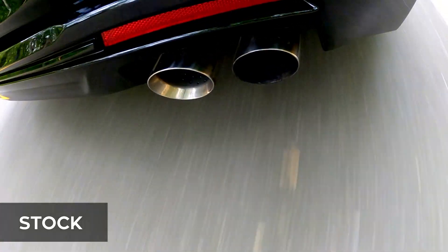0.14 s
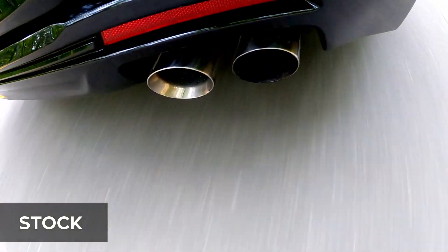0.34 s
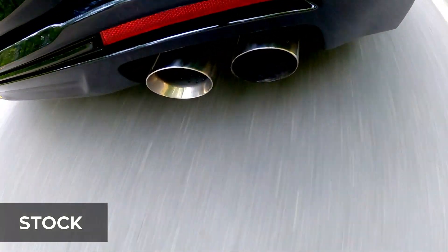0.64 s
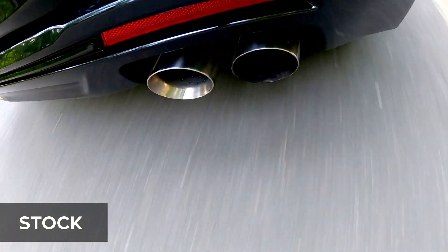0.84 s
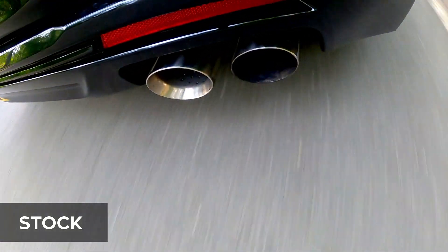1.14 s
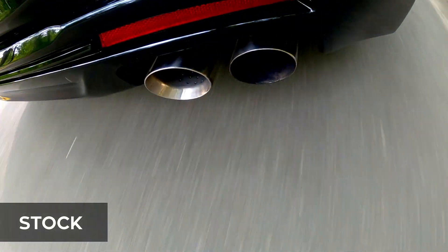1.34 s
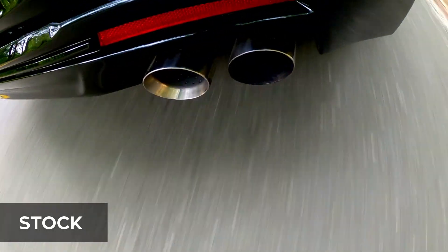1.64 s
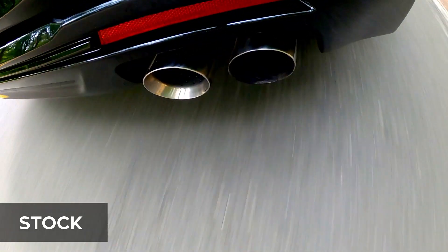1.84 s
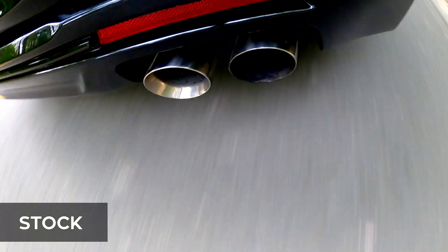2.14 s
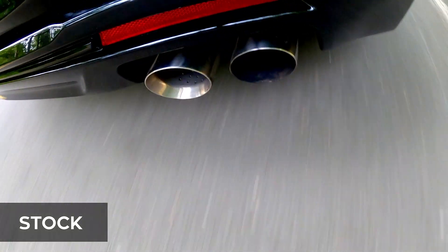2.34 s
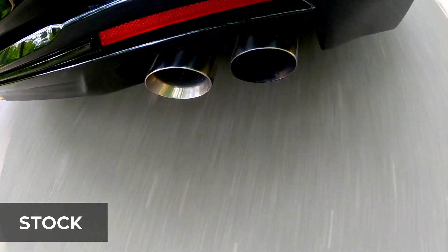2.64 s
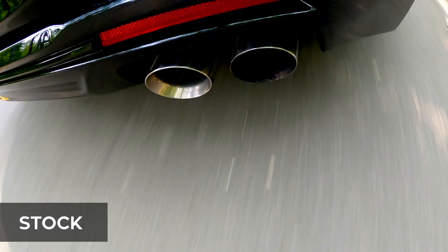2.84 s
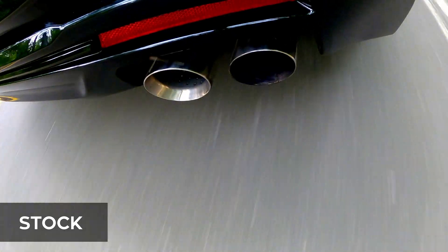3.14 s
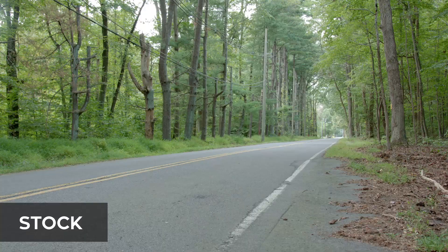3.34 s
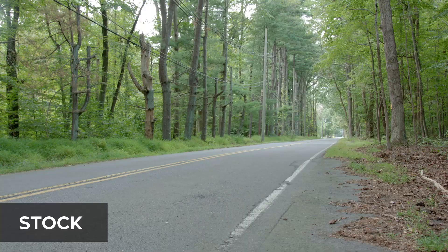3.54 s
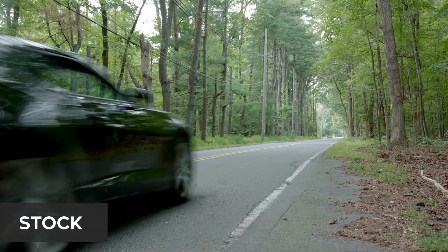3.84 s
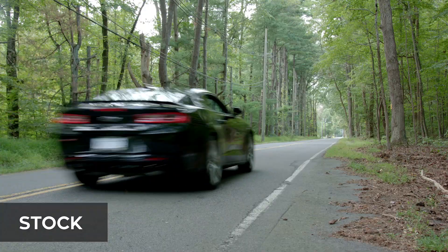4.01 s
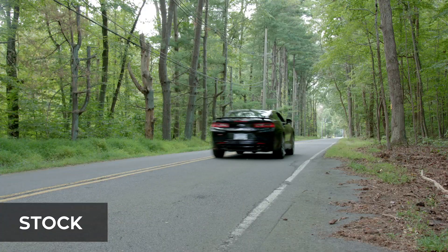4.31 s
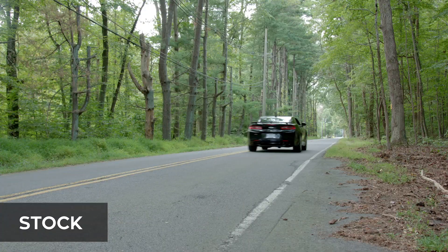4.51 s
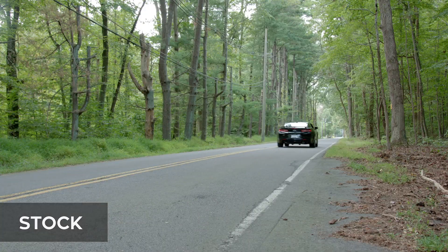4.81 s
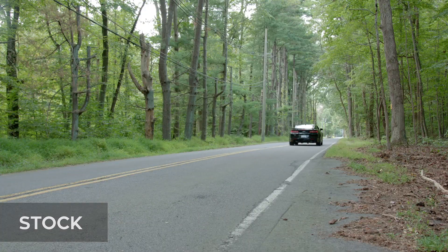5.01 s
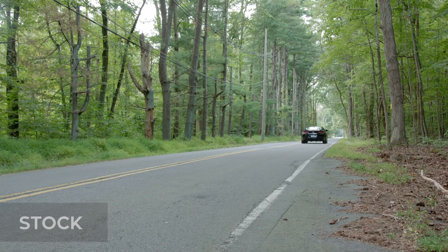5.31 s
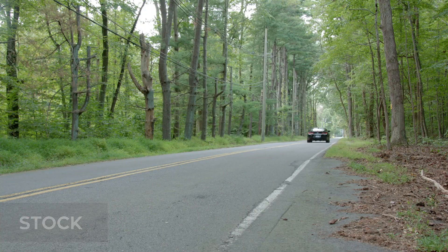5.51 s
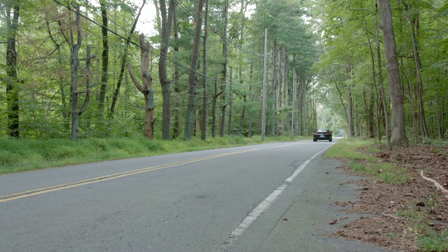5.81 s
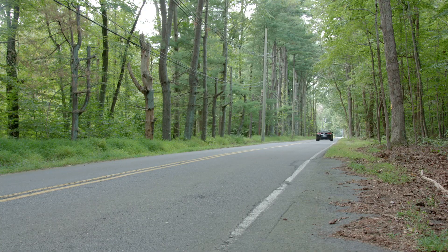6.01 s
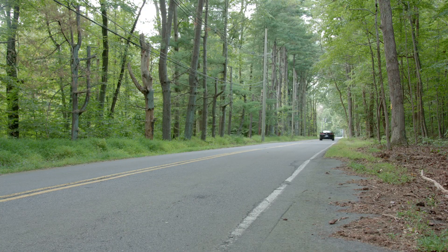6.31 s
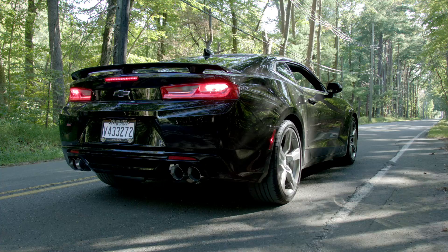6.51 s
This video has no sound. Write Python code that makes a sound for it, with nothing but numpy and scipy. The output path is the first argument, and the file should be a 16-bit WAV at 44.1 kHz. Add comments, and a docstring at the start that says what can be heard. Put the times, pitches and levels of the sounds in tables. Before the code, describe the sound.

A V8 sports car pulls hard heard beside its tailpipes, burbles off the throttle, then roars past, cracks on the upshift and recedes.

```python
"""Beside the tailpipes of a V8 sports car, an overloaded microphone hears it pull hard, lift off and
pull again. Then, from the verge of a wooded road, it rushes past, cracks on the upshift, pulls away and
lifts off; at last it burbles at idle, heard from close behind. Eight uneven firings repeat every engine
cycle: the pipes boom and bark, gas rasps in the pulses, tyres and wind roar."""
import sys
import numpy as np
from scipy import signal
from scipy.fft import rfft, irfft, next_fast_len
from scipy.io import wavfile
from scipy.ndimage import uniform_filter1d

SR = 44100
rng = np.random.default_rng(int(sys.argv[2]) if len(sys.argv) > 2 else 0)


def inscribe(sig):
    """Save sig as 16-bit PCM at rate SR to the path in sys.argv[1].

    A 1-D sig is mono; a 2-D sig holds one channel per row.
    Samples are clipped to [-1, 1] before scaling.
    """
    pcm = np.round(np.clip(np.atleast_2d(sig).T, -1, 1) * 32767)
    wavfile.write(sys.argv[1], SR, pcm.astype(np.int16))


N = 293706
T = np.arange(N) / SR
VERGE_S, IDLE_S = 3.278, 6.445  # the second and third microphone positions begin


def undb(db):
    """Decibels to gain."""
    return 10 ** (np.asarray(db) / 20)


def unit(x):
    """Scale to rms 1."""
    return x / np.sqrt(np.mean(x ** 2))


def curves(rows):
    """Each column after the first (time) as a control, sample by sample."""
    times_s, *columns = np.transpose(rows)
    return [np.interp(T, times_s, column) for column in columns]


def colour(x, points):
    """Filter by a spectrum of (freq_hz, level_db) points; rms 1."""
    size = next_fast_len(N + 8192)
    hz, db = np.transpose(points)
    bins_hz = np.maximum(np.fft.rfftfreq(size, 1 / SR), 1)
    skirt = np.minimum(bins_hz / hz[0], 1) ** 2 * np.minimum(hz[-1] / bins_hz, 1) ** 2
    gain = undb(np.interp(np.log(bins_hz), np.log(hz), db))
    return unit(irfft(rfft(x, size) * skirt * gain, size)[:N])


def noise(points):
    """Coloured noise of rms 1."""
    return colour(rng.standard_normal(N), points)


def walk(rate_hz):
    """Glides between random values, rate_hz of them a second; rms 1."""
    hold = int(SR / rate_hz)
    steps = np.repeat(rng.standard_normal(N // hold + 1), hold)
    return unit(uniform_filter1d(steps, hold)[:N])


def after(centre_s, fade_s):
    """Rises from 0 to 1 around centre_s."""
    return np.clip((T - centre_s) / fade_s + .5, 0, 1)


def swell(peak_s, width_s):
    """A bell curve that reaches 1 at peak_s."""
    return np.exp(-((T - peak_s) / width_s) ** 2)


def repeat(cycle, turns):
    """Play one engine cycle over and over; turns counts the cycles gone by."""
    return np.interp((turns % 1) * len(cycle), np.arange(len(cycle) + 1), np.r_[cycle, cycle[0]])


# The cylinders in firing order: late_firing_intervals, boom_db, bark_db, coast_db
CYLINDER_PULSES = [(-0.00029, 1, 5, 4), (0.265, 1, -2, 2.5), (0.054, 1, -3, -7.5), (0.108, 0, -4, -10.5),
                   (0.276, -1, 2, -16.5), (-0.036, 0.5, -9, -14), (.18, -1, -1, -12),
                   (0.045, -1.5, -11.5, 3.5)]


def firings(cylinders=8):
    """Each exhaust pulse's place in the cycle (the far bank's arrive late) and its three strengths."""
    late, *strengths_db = np.transpose(CYLINDER_PULSES)
    return (np.arange(cylinders) + late) / cylinders, *undb(strengths_db)


def pipe_note(turns, db, boom_orders, contrast=1.5, lope=0, size=1024):
    """Firings ring the pipes: boom (low multiples of the cycle rate) and bark (the rest), each rms 1."""
    place, boom, bark, coast = firings()
    orders = np.arange(len(db)) + 1
    pulses = np.exp(-2j * np.pi * np.outer(orders, place))
    boom_pattern = pulses @ ((1 - lope) * boom + lope * coast)
    bark_pattern = pulses @ bark ** contrast  # one cylinder barks hardest: a throb once a cycle
    parts = []
    for pattern, band in (boom_pattern, orders <= boom_orders), (bark_pattern, orders > boom_orders):
        # an open pipe radiates the change of the flow: a quarter turn of phase
        spectrum = 1j * undb(db) * band * pattern / np.abs(pattern)
        cycle = unit(irfft(np.r_[0, spectrum], size))
        parts.append(repeat(cycle, turns))
    return np.array(parts)


# Pulls on the throttle while riding along: down_s, fade_start_s, fade_length_s
# The first dies away as the driver lifts; the second fades out before the scene changes.
THROTTLE_PULLS = [(-.5, 0.598, .26), (1.493, 2.946, .35)]


def engine_load(press_s=0.19, fade_curve=1.7):
    """Strength of the pull, 0 to 1 (flat out): it builds evenly, then fades, slowly at first."""
    load = np.zeros(N)
    for down_s, fade_start_s, fade_length_s in THROTTLE_PULLS:
        pressed = np.clip((T - down_s) / press_s, 0, 1)
        faded = np.clip((T - fade_start_s) / fade_length_s, 0, 1) ** fade_curve
        load += pressed * (1 - faded)
    return load


def effort(cycle_hz, load, full_db, coast_db, octave_db, cruise_hz=30.1):
    """Exhaust level in dB: it rises with load and with each octave of revs."""
    return load * full_db + (1 - load) * coast_db + octave_db * np.log2(cycle_hz / cruise_hz)


# The note at the pipes, a row per multiple of the cycle rate from 1 up:
# low_revs_db, middle_revs_db, high_revs_db, coast_db
CLOSE_HARMONICS = [(-33, -50, -27, -16), (-21, -20, -22, -4.5), (-27, -15.5, -11.5, -19),
                   (-14.5, -11.5, -13.5, -3.5), (-14.5, -22, -12.5, -5), (-9, -9.5, -11, -8.5),
                   (-31, -38, -15, -2), (1.5, -0.5, 0.5, 6), (-15, -16, -5.5, -10), (-12, -8.5, -9.5, 5.5),
                   (-20, -5.5, -6, -9.5), (-2, -6, -12.5, -21.5), (-10.5, -32, -36, -22.5),
                   (-15, -21.5, -35, -26.5), (-21.5, -40, -35, -12.5), (-22.5, -9.5, -12.5, -4.5),
                   (-23, -15.5, -42, -25.5), (-16, -21.5, -20, -8.5), (-32, -17, -12, -22),
                   (-14.5, -20, -6, -9), (-40, -26, -35, -24), (-31, -15.5, -5, -7.5),
                   (-14, -19, -7.5, -23), (-6.5, -9.5, -5.5, -1.5), (-21, -9, -4.5, -9),
                   (-9, -3.5, -16.5, -14.5), (-8.5, -22, -16, -3), (-25, -20, -32, -25),
                   (-19, -11.5, -23.5, -22.5), (-13, -24.5, -15.5, -17), (-10, -23.5, -25.5, -26),
                   (-33, -30, -41, -25), (-24, -16, -33, -35.5), (-16, -15, -38, -29),
                   (-23.5, -19, -24.5, -27), (-18.5, -22, -23, -39)]
# The throb at low, middle and high revs: cycle_hz, bark_contrast, lope_share
REV_RANGES = [(26.67, 0.64, .7), (29.7, 1.43, 0.45), (32.6, 2.5, 0.045)]


def close_exhaust(turns, cycle_hz, load, throttle):
    """Boom and bark right at the pipes: the note changes with revs and throttle."""
    *loaded_db, coast_db = np.transpose(CLOSE_HARMONICS)
    revs_hz, contrasts, lopes = np.transpose(REV_RANGES)
    shares = [np.interp(cycle_hz, revs_hz, row) for row in np.eye(len(loaded_db))]
    pull = sum(share * pipe_note(turns, db, boom_orders=15, contrast=contrast, lope=lope)
               for share, db, contrast, lope in zip(shares, loaded_db, contrasts, lopes))
    # off the throttle the charges burn unevenly
    overrun = pipe_note(turns, coast_db, boom_orders=15, lope=1.0) * undb(1.8 * walk(35.14))
    boom, bark = np.sqrt(throttle) * pull + np.sqrt(1 - throttle) * overrun
    boom_db = effort(cycle_hz, load, full_db=-16.0, coast_db=-31.5, octave_db=11)
    bark_db = effort(cycle_hz, load, full_db=-19.5, coast_db=-39.5, octave_db=17)
    return boom * undb(boom_db + 0.59 * walk(90)) + bark * undb(bark_db + walk(120))


def puffs(turns, decay_cycles, contrast, size=1024):
    """Gas flow: a surge at each firing that dies within a share of the cycle."""
    place, _, bark, _ = firings()
    age = (np.arange(size)[:, None] / size - place) % 1
    return unit(repeat(np.exp(-age / decay_cycles) @ bark ** contrast, turns))


# Churning gas, close up: freq_hz, level_db
CHURN_SPECTRUM = [(50, -14), (120, -2.5), (270, -7), (450, -4.5), (600, -1), (780, 9.5), (1000, -20),
                  (1500, -28)]


def churn(turns, cycle_hz, load):
    """Low noise pulsing with the gas flow; it stands out as the bark fades off the throttle."""
    flow = rng.standard_normal(N) * puffs(turns, decay_cycles=.1, contrast=.9)
    level_db = effort(cycle_hz, load, full_db=-31.5, coast_db=-41.0, octave_db=16.5)
    return colour(flow, CHURN_SPECTRUM) * undb(level_db)


def rasp(turns, fresh, decay_cycles, contrast, size=1400):
    """Gas tearing out in puffs: part repeats every cycle, part is fresh turbulence."""
    locked = repeat(signal.resample(rng.standard_normal(size), 2 * size), turns)
    return (locked + fresh * rng.standard_normal(N)) * puffs(turns, decay_cycles, contrast)


# Rasping and spitting gas at the pipe mouths: freq_hz, level_db
RASP_SPECTRUM = [(850, -10.5), (1020, -1.5), (1350, -5.5), (1690, 0.5), (2150, -10.5), (2560, -5.5),
                 (3050, -12), (3330, -7), (3850, -19), (4350, -19.5), (6000, -31), (9000, -39.5),
                 (15500, -50)]
SPIT_SPECTRUM = [(2800, -26), (5000, 8), (7000, -5), (11000, -16.5), (15500, -22)]


def gas_jets(turns, cycle_hz, load, howl_hz=32.27):
    """Gas rasps from the pipes, tearing harder under load as the cycle rate passes howl_hz."""
    howl = load * np.clip((cycle_hz - howl_hz) / 0.72 + .5, 0, 1)
    rasp_db = effort(cycle_hz, load, full_db=-28.5, coast_db=-55.0, octave_db=15.5) + 3.05 * howl
    tearing = rasp(turns, fresh=.5, decay_cycles=.18, contrast=.12)
    gas = colour(tearing * undb(1.56 * walk(200)), RASP_SPECTRUM) * undb(rasp_db)
    # the hardest firings spit, more so the faster the gas flows
    jets = rng.standard_normal(N) * puffs(turns, decay_cycles=.014, contrast=1.2)
    spit = colour(jets, SPIT_SPECTRUM) * undb(1.825 * rasp_db - 1 + 2.9 * walk(60))
    return gas + spit


# Wind and road at the microphone on the car: freq_hz, level_db
WIND_SPECTRUM = [(20, -13.5), (32, -7), (60, 1), (120, -8.5), (250, 1), (420, -13), (750, -4.5),
                 (1100, -16), (2500, -27), (5000, -64), (9000, -72.5)]


def wind():
    """Wind and road noise on the moving car, fluttering about a steady level."""
    return noise(WIND_SPECTRUM) * undb(-37.0 + 2.6 * walk(8.56))


def pops(rows, spectrum, decay_s, tail, tail_s=0.0061):
    """Unburnt fuel goes off in the pipes: a blow with a noisy tail, coloured by the pipes."""
    bursts = np.zeros(N)
    age = np.arange(SR // 20) / SR
    envelope = np.exp(-age / decay_s) + tail * np.exp(-age / tail_s)
    for start_s, level_db in rows:
        start = int(start_s * SR)
        bursts[start:start + len(age)] += undb(level_db) * rng.standard_normal(len(age)) * envelope
    return colour(bursts, spectrum) * np.std(bursts)


# Burbles, first at the pipes, later far down the road: start_s, relative_db
BURBLE_POPS = [(.952, -1), (.986, 5), (1.02, -0.5), (1.054, 1.5), (1.405, 0.5), (1.425, -3), (1.486, -6.5),
               (5.965, -18.5), (5.998, -13), (6.032, -16)]
# The hollow tone of a burble: freq_hz, level_db
BURBLE_SPECTRUM = [(60, -13.5), (130, -14.5), (260, 11.5), (350, -4.5), (450, -28.5), (760, -9),
                   (1100, -40.5)]


def burbles():
    """Soft pops of fuel in the pipes off the throttle."""
    return pops(BURBLE_POPS, BURBLE_SPECTRUM, decay_s=0.01, tail=0.16) * undb(-22)


def overload(x, ceiling, knee):
    """A microphone stage that flattens the peaks."""
    return x / (1 + np.abs(x / ceiling) ** knee) ** (1 / knee)


# Engine speed while riding along: time_s, cycle_hz
ONBOARD_REVS = [(0, 29.6), (.1, 30.54), (.36, 32.25), (.58, 33.18), (.71, 34.08), (.79, 33), (.9, 33),
                (1.1, 30.25), (1.51, 24.38), (1.66, 26.56), (1.78, 25.49), (1.9, 26.43), (2.5, 28.53),
                (2.95, 30.39), (3.06, 30.06), (3.28, 30.07)]


def beside_tailpipes():
    """Microphone on the car, so near the pipes that they overload it."""
    cycle_hz, = curves(ONBOARD_REVS)
    load = engine_load()
    throttle = np.clip(1.7 * load, 0, 1)
    wander = (0.000897 + 0.00609 * (1 - throttle)) * walk(60)
    turns = np.cumsum(cycle_hz * (1 + wander)) / SR + .85
    note = close_exhaust(turns, cycle_hz, load, throttle)
    gas = churn(turns, cycle_hz, load) + gas_jets(turns, cycle_hz, load)
    return overload(note + gas + wind() + burbles(), ceiling=.298, knee=12)


SPEED_M_S, VERGE_M = 22.8, 4.39  # the car's speed, and its closest distance to the microphone
NOSE_S, TAIL_S, ROAR_PEAK_S = 3.75, 3.947, 4.01  # the nose arrives, the tail is closest, the roar peaks
CUT_S, CUT_WIDTH_S, BITE_S, BITE_WIDTH_S = 4.075, 0.033, 4.155, 0.058  # upshift: drive cut, then bite
LIFT_S, LIFT_FADE_S = 5.753, .18  # far down the road the driver lifts off


def position():
    """Distance as a multiple of the closest, and how far the car faces us (1 nose on, 0 tail on)."""
    along_m = SPEED_M_S * (T - TAIL_S)
    distance_m = np.hypot(along_m, VERGE_M)
    return distance_m / VERGE_M, (1 - along_m / distance_m) / 2


def passing(near_db, doubling_db, ahead_db, alongside_db, shift_db, lift_db, coast_db_per_s):
    """Level in dB at the verge, shaped by distance, heading, the upshift and the lift."""
    distance, ahead = position()
    alongside = after(NOSE_S, .08) * ahead
    heading_db = ahead_db * ahead + alongside_db * alongside
    shift = swell(BITE_S, BITE_WIDTH_S) - 0.57 * swell(CUT_S, CUT_WIDTH_S)
    coast_db = lift_db * after(LIFT_S, LIFT_FADE_S) + coast_db_per_s * np.maximum(T - LIFT_S, 0)
    return near_db + doubling_db * np.log2(distance) + heading_db + shift_db * shift + coast_db


# The note from the verge, a row per multiple of the cycle rate from 1 up:
# approaching_db, leaving_low_revs_db, leaving_higher_revs_db
VERGE_HARMONICS = [(-40, -51, -46), (-25, -29.5, -32.5), (-16.5, -18, -15), (-10, -16.5, -13),
                   (-6.5, -22, -12), (-15, -8.5, -15.5), (-25, -19, -22), (0.5, 1, 1.5), (-11, -15, -8),
                   (-18, -19, -7.5), (-21, -6, 2), (-22, -2.5, -3.5), (-28, -12.5, -25), (-8, -16, -9.5),
                   (-20, -20, -5.5), (-5, -0.5, -0.5), (-9, -16, -20), (-1, -17.5, -24), (-17, -37, -11),
                   (-10, -21, -6.5), (-12, -21, -8), (-5, -17.5, -12.5), (-29, -16, -9.5), (-20, -23, -14),
                   (-31, -19.5, -26), (-19, -19, -21)]
# Turbulent roar in the boom and in the bark: freq_hz, level_db
BOOM_SPECTRUM = [(40, -28.5), (80, -10), (150, -11), (290, 5), (400, -7), (520, -10.5), (900, -42.5)]
BARK_SPECTRUM = [(280, -28), (440, 1), (700, -3.5), (900, -15), (1300, -28.5)]


def passing_exhaust(turns):
    """One note while approaching, another once past, which brightens as the revs climb."""
    past, climbed = after(4.05, 0.22), after(5.01, 0.61)
    shares = [1 - past, past * (1 - climbed), past * climbed]
    boom, bark = sum(share * pipe_note(turns, db, boom_orders=14, contrast=3.1)
                     for share, db in zip(shares, np.transpose(VERGE_HARMONICS)))
    # the note turns to roar as the tail goes by, and partly so close up, ahead and off the throttle
    distance, ahead = position()
    rough = 0.15 + 0.66 * swell(ROAR_PEAK_S, .11) + .18 / distance + .15 * ahead
    boom_rough = np.clip(rough + .33 * after(LIFT_S, LIFT_FADE_S), 0, .98)
    bark_rough = np.clip(1.6 * boom_rough + .3 / distance, 0, .97)
    boom = np.sqrt(1 - boom_rough ** 2) * boom + boom_rough * noise(BOOM_SPECTRUM)
    bark = np.sqrt(1 - bark_rough ** 2) * bark + bark_rough * noise(BARK_SPECTRUM)
    boom_db = passing(near_db=-15.0, doubling_db=-3.5, ahead_db=-20, alongside_db=1.5,
                      shift_db=1.0, lift_db=-12.5, coast_db_per_s=-14)
    bark_db = passing(near_db=-22, doubling_db=-2.3, ahead_db=-19.5, alongside_db=12.5,
                      shift_db=2.5, lift_db=-13, coast_db_per_s=-6.5)
    return boom * undb(boom_db) + bark * undb(bark_db)


# Tyre roar, hiss and finest hiss from the verge: freq_hz, level_db
TYRE_SPECTRUM = [(300, 0.5), (700, 2), (950, 2.5), (1300, 1), (1900, -5), (2700, -8), (3600, -24.5),
                 (5000, -28.5), (9000, -60)]
HISS_SPECTRUM = [(2000, -12), (3300, 5), (4800, 0), (6000, -7), (7500, -10.5), (10000, -22.5), (15500, -40)]
FINE_HISS_SPECTRUM = [(4000, -12), (8000, -0.5), (10500, -6.5), (12500, -7), (15500, -10)]


def tyre_rush(turns):
    """Tyres roar and hiss on the road; gas rasp joins in while the pipes point back under load."""
    roar_db = passing(near_db=-28.0, doubling_db=-4, ahead_db=-10.5, alongside_db=10,
                      shift_db=6, lift_db=1.0, coast_db_per_s=-10)
    hiss_db = passing(near_db=-42.0, doubling_db=-5.0, ahead_db=-11.5, alongside_db=8.5,
                      shift_db=5, lift_db=-5.5, coast_db_per_s=-16)
    facing = after(4.1, 0.034) * (1 - after(LIFT_S, .12))
    rush = rng.standard_normal(N) * (1 - 0.29 * facing)
    rush += 0.64 * facing * rasp(turns, fresh=0.3, decay_cycles=0.12, contrast=0.7)
    roar = colour(rush, TYRE_SPECTRUM) * undb(roar_db + 1.22 + walk(30))
    hiss = colour(rush, HISS_SPECTRUM) * undb(hiss_db)
    # far down the road mostly the middle of the tyre noise is left
    far = noise([(600, -17), (1050, 1.5), (1300, -0.5), (1900, -9.0), (3500, -33.5)]) * undb(roar_db)
    gone = after(5.8, 0.12)
    # the finest hiss carries only a few metres
    nearby = (0.55 + 0.46 * after(NOSE_S, 0.053)) / (1 + np.abs((T - 4.02) / 0.38) ** 3)
    fine_hiss = noise(FINE_HISS_SPECTRUM) * undb(-55.5) * nearby
    return (1 - 0.57 * gone) * roar + gone * far + hiss + fine_hiss


def rumble():
    """The car rumbles by and its wake buffets the microphone."""
    level_db = passing(near_db=-40, doubling_db=-7, ahead_db=-14, alongside_db=16,
                       shift_db=7, lift_db=-3, coast_db_per_s=-1.5)
    wake = undb(-36) * swell(peak_s=3.95, width_s=.09)
    return noise([(20, -13), (45, -7), (70, -2.5), (125, -6), (200, -24)]) * (undb(level_db) + wake)


def swinging_roar(from_hz=288, to_hz=694, turn_s=4.07, turn_width_s=0.0696):
    """A band of roar rises as the pipes swing towards the verge, and dips while the drive is cut."""
    centre_hz = from_hz + (to_hz - from_hz) * (1 + np.tanh((T - turn_s) / turn_width_s)) / 2
    phase = 2 * np.pi * np.cumsum(centre_hz) / SR
    gain = swell(ROAR_PEAK_S, .25) * after(NOSE_S, 0.22) * undb(-20 - 7 * swell(CUT_S, CUT_WIDTH_S))
    sidebands = [(8, 0), (35, -2), (80, -10), (180, -26)]  # offset_hz, level_db
    return (noise(sidebands) * np.cos(phase) + noise(sidebands) * np.sin(phase)) * gain


# Exhaust cracks just past the microphone: start_s, relative_db
UPSHIFT_POPS = [(4.114, -12), (4.133, -14.5), (4.142, -19), (4.152, -16), (4.16, -22), (4.169, -18.5),
                (4.177, -29), (4.186, -15), (4.196, -21.5), (4.205, -20), (4.297, -22.5), (4.341, -23),
                (4.374, -24)]
# The tone of a crack: freq_hz, level_db
CRACK_SPECTRUM = [(120, -21), (350, -3.5), (650, 7.5), (1100, -11), (2600, -8), (5000, -22), (8000, -43),
                  (15000, -53)]


def upshift_cracks():
    """Fuel goes off sharply in the pipes on the upshift."""
    return pops(UPSHIFT_POPS, CRACK_SPECTRUM, decay_s=0.0018, tail=0.11) * undb(0.5)


# Engine speed as heard from the verge, through pass, upshift and lift: time_s, cycle_hz
VERGE_REVS = [(3.29, 39), (3.58, 39.54), (3.88, 33.43), (4.07, 25.05), (4.18, 28.05), (4.27, 25.8),
              (4.36, 26.95), (4.46, 27.06), (4.8, 28.28), (5.68, 31.05), (5.77, 30.32), (5.93, 30.2),
              (6.43, 24.9)]


def from_verge():
    """Microphone on the verge: a faint approach, a roar in passing, then the pipes face it and recede."""
    cycle_hz, = curves(VERGE_REVS)
    turns = np.cumsum(cycle_hz * (1 + 0.00119 * walk(50))) / SR + .15
    car = passing_exhaust(turns) + tyre_rush(turns) + rumble()
    return car + upshift_cracks() + swinging_roar() + burbles()


# Idle tones close behind the car: cycle_multiple, rms_db
IDLE_HARMONICS = [(6, -47), (8, -38), (19, -47.5)]
# Puffs of gas at idle: freq_hz, level_db
IDLE_SPECTRUM = [(50, -14), (80, -8), (125, -14), (185, -9), (230, -2), (330, 3), (420, -4), (540, -8),
                 (640, -20), (800, -23), (950, -20), (1300, -27.5), (3000, -45), (8000, -53)]


def idle(cycle_hz=9.75):
    """Microphone close behind the car: a deep wavering firing tone and soft lumpy puffs."""
    turns = cycle_hz * (T - IDLE_S)
    tone = sum(undb(rms_db + 1.64 * walk(30)) * np.sqrt(2) * np.sin(2 * np.pi * order * turns)
               for order, rms_db in IDLE_HARMONICS)
    gas = rasp(turns, fresh=1.0, decay_cycles=0.19, contrast=0.44)
    return tone + colour(gas, IDLE_SPECTRUM) * undb(-39.0)


def scene():
    """Three microphone positions, one after the other, in mono."""
    verge, behind = after(VERGE_S, 0.011), after(IDLE_S, .006)
    return ((1 - verge) * beside_tailpipes() + (verge - behind) * from_verge() + behind * idle())[None]


def record(dry):
    """The recorder cuts the highest treble."""
    top_hz = 15750
    return signal.sosfilt(signal.ellip(10, .1, 80, top_hz, fs=SR, output="sos"), dry)


dry = scene()
out = record(dry)
inscribe(out)
```